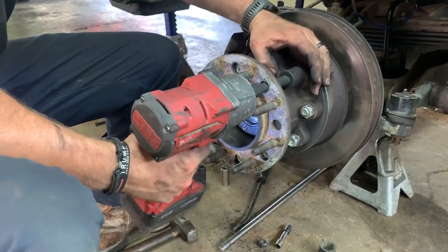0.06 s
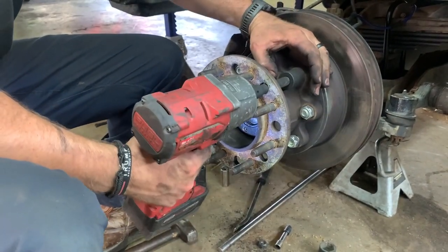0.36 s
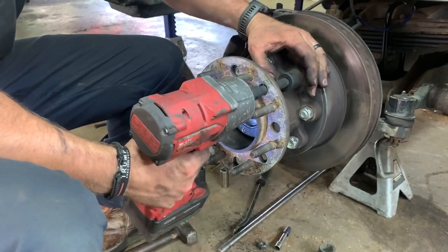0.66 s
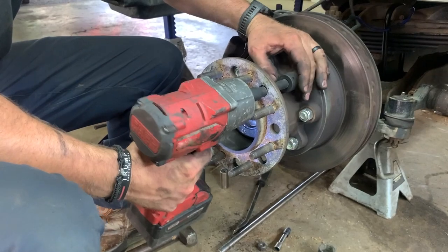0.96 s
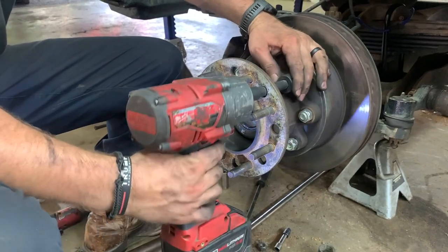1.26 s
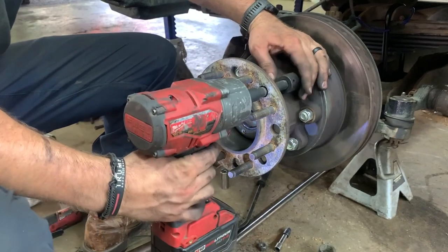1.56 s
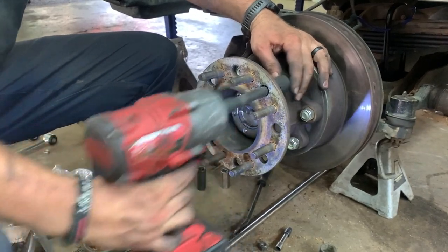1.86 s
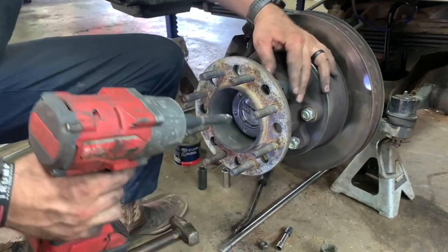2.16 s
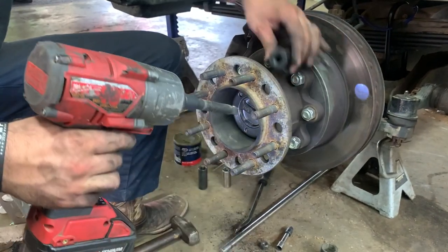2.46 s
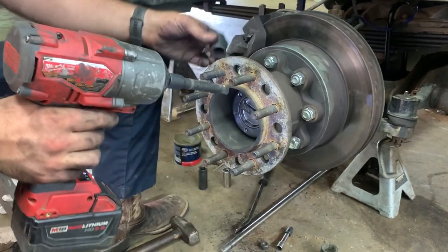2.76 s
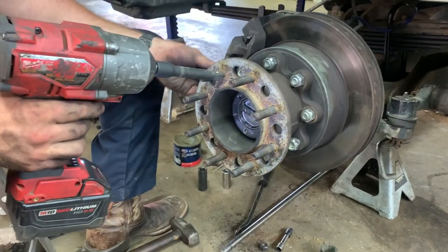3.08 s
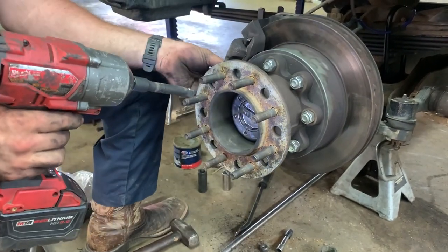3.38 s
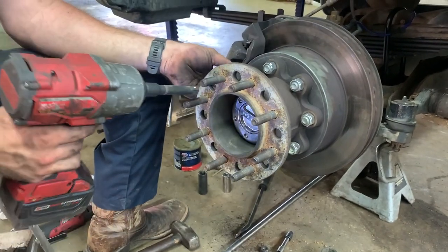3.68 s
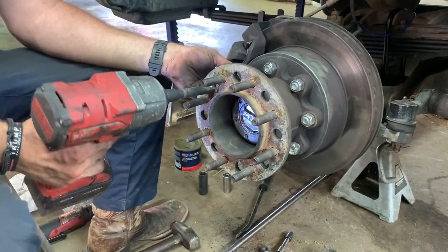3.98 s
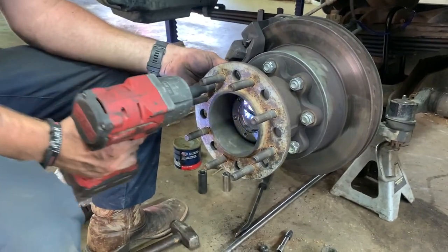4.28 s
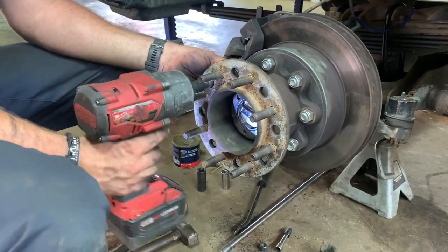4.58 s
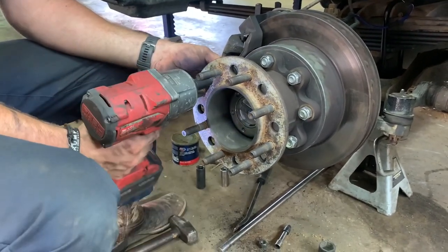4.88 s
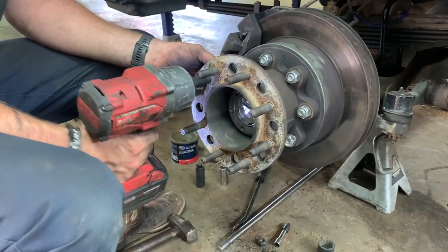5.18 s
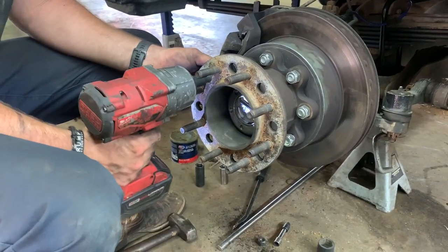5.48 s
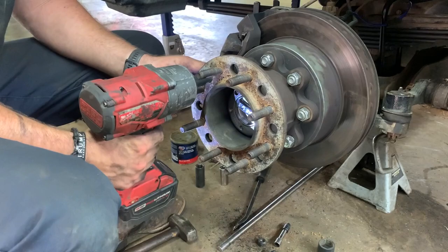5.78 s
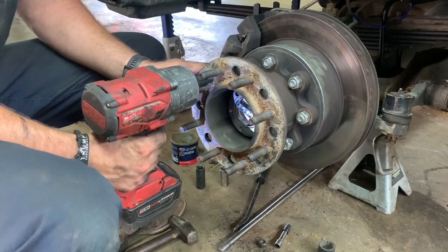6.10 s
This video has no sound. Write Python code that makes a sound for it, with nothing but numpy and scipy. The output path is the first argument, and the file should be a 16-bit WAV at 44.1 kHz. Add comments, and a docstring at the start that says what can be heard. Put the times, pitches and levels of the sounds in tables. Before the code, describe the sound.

A loud, fast metallic rattle opens the scene as a cordless impact wrench drives a nut, making the truck hub and brake disc ring. It stops, and the steel socket comes away with bright clinks and a fading shimmer. Scattered small taps and a few soft low thuds fill the pause, until a brief rasp starts a second hammering burst. The microphone is near, in a garage with a short echo and faint hum.

```python
"""A garage, a closely spaced microphone pair facing a truck hub. A cordless impact wrench hammers a nut
for a second: each blow cracks through the socket and rings hub and brake disc over the motor's whirr.
The socket clinks off the nut and sings freely; soft sliding hisses and more clinks take it to the next
nut. At five seconds it engages with a short loud rasp and the wrench hammers again. Soft low thuds
boom now and then, and the room's tail and a faint hum lie behind it all."""
import sys
import numpy as np
from scipy import signal
from scipy.fft import rfft, irfft
from scipy.io import wavfile
from scipy.ndimage import uniform_filter1d

SR = 44100
rng = np.random.default_rng(int(sys.argv[2]) if len(sys.argv) > 2 else 0)


def unload_wav(signal):
    """Save mono or channel-first audio to the path in sys.argv[1] as 16-bit WAV at rate SR, clipped to [-1, 1]."""
    wavfile.write(
        sys.argv[1],
        SR,
        np.round(np.clip(np.atleast_2d(signal).T, -1, 1) * 32767).astype(np.int16),
    )


N = 270774
TIME = np.arange(N) / SR

# hammer blows, about 27-35 a second; the first burst stumbles to a stop:
# (time [s], force [dB], treble crack trim [dB], low clack trim [dB], t60 of the clang [s])
BLOWS = [(0.013, -18.5, -0.5, -8, 0.061), (0.049, -19.5, 3, -5, 0.044), (0.0856, -19, -2.5, -7, 0.041),
         (0.1216, -21.0, 7, -5, 0.03), (0.1569, -20.5, 0.5, -10, 0.1), (0.1875, -22, 4, -4.5, 0.067),
         (0.2153, -20, 2.5, -5.5, 0.058), (0.2424, -17, 2.5, -6.5, 0.043), (0.2716, -17, 2.5, -9.5, 0.04),
         (0.3002, -20, 3.5, -4.0, 0.054), (0.329, -20.5, 5.5, -8, 0.08), (0.358, -18.5, 3.5, -9.5, 0.045),
         (0.386, -18, 2.5, -8, 0.07), (0.4151, -18.5, 2, -8, 0.056), (0.4436, -18.5, 5.5, -4.5, 0.053),
         (0.472, -17.5, 4, -9, 0.044), (0.5, -20.5, 4.5, -6, 0.058), (0.529, -18.5, 1, -8, 0.055),
         (0.5583, -18.5, 3.5, -12, 0.094), (0.5873, -19.0, 2.5, -6.5, 0.064),
         (0.6157, -17.5, 3.5, -5, 0.058), (0.6463, -17.5, 4.5, -4, 0.031), (0.6742, -19, 6, -8.5, 0.04),
         (0.7043, -20, 10, -8, 0.021), (0.7327, -20.5, 4.5, -9.5, 0.053), (0.7618, -23.5, 2, -6, 0.056),
         (0.7915, -22, 5, -8, 0.049), (0.8205, -22.5, 5.5, -4.5, 0.035), (0.8504, -21, 6.5, -6.5, 0.03),
         (0.879, -22.5, 3, -7, 0.039), (0.9079, -19, 4, -3, 0.036), (0.9382, -23, 4.0, -10.5, 0.062),
         (0.9682, -20, 3.5, -7, 0.063), (0.9911, -24.5, 1.5, -2, 0.048), (1.0001, -22.5, 6, 2, 0.059),
         (1.0258, -23.5, 8.5, -5, 0.044), (1.0447, -26.5, 8, -13, 0.069), (1.061, -27.5, 3.5, -14, 0.055),
         (5.0894, -20.5, 1.5, -5.5, 0.076), (5.129, -20, 4, -7.5, 0.045), (5.167, -21, 4, -8, 0.05),
         (5.205, -22.5, 5, -6, 0.039), (5.2412, -19.5, 0.5, -5.5, 0.049), (5.2778, -20, 4.5, -7, 0.051),
         (5.3141, -23, 5.5, -2.5, 0.041), (5.3515, -20, 5, -7.5, 0.039), (5.387, -20, 4, -10, 0.042),
         (5.425, -19.5, 0.5, -7.5, 0.045), (5.4619, -23, 5, -6.5, 0.069), (5.4996, -18.5, 2.5, -7, 0.05),
         (5.5358, -21.5, 3.0, -4.5, 0.093), (5.564, -19, 4, -6, 0.067), (5.5918, -17.5, 4.5, -3.5, 0.067),
         (5.6208, -17, 2.5, -6, 0.06), (5.6484, -21.0, 6, -4.5, 0.059), (5.678, -16.0, 5.5, -10.5, 0.037),
         (5.7072, -19.0, 3.5, -8, 0.072), (5.735, -22, 1.5, -7.5, 0.045), (5.7648, -19, 4.5, -7.5, 0.038),
         (5.7921, -19.5, 0.5, -9, 0.04), (5.8224, -21.0, 7.5, -7, 0.077), (5.85, -19, 3.0, -11.5, 0.064),
         (5.879, -21.5, 4, -7.5, 0.075), (5.907, -19.5, -2.5, -8.5, 0.061), (5.9371, -19.5, 6.5, -7, 0.056),
         (5.9659, -22.5, 1, -3.5, 0.054), (5.9936, -20.5, 3, -9, 0.052), (6.0231, -20.5, 2.5, -5.5, 0.063),
         (6.0523, -19.0, 2, -9.5, 0.041), (6.0813, -21, 0.5, -10, 0.055), (6.1106, -21, 2.5, -6, 0.058)]
# socket and nuts touching the studs: (time [s], relative click level [dB], tilt [dB/octave],
# click peak [Hz], its lift [dB], ring level [dB], ring centre [Hz], ring spread [octaves])
CLINKS = [(1.29, -69, -1.5, 2270, 4, -80, 2270, 0.33), (1.611, -66.5, -4.5, 2686, 9, -82.5, 2700, .5),
          (1.687, -65, -3.5, 4000, -1, -76, 3510, 0.52), (1.7379, -44.5, 0, 10200, 2, -67, 4500, 1),
          (1.7807, -36, -0.5, 10000, 10.5, -39, 4570, .14), (1.808, -39.5, 3.5, 3570, 11, -41, 3750, 0.44),
          (1.809, -43, 1, 2200, -2, -44, 15100, .06), (1.8509, -33, 5.5, 10400, -1, -44, 6800, 1.06),
          (1.858, -41.5, -4, 2230, 8, -43.5, 2670, 0.29), (1.958, -52, -6, 520, 6, -52, 524, 0.71),
          (2.141, -60.5, -3.5, 3600, 16, -62, 3620, 0.091), (3.062, -48, 5.5, 3030, 11, -63, 4060, 0.78),
          (3.17, -54, 4.5, 6600, 10.5, -58, 15050, .22), (3.174, -59, 4, 3000, 18, -63, 3250, 0.22),
          (3.234, -70, -2, 6500, 4.5, -77, 4500, 1), (3.487, -58, 6, 6700, 15, -66, 2920, 0.38),
          (3.6, -63, 1, 2200, 8.5, -64.5, 2230, 0.53), (3.784, -48, -3, 1680, 11, -54, 1785, 0.13),
          (3.7944, -49.5, -4.5, 1150, 9, -51, 2730, 0.41), (3.796, -52.5, -3, 3500, 18, -64, 5970, 0.52),
          (3.932, -66.5, -3, 5500, 8, -76, 4500, 1), (4.2412, -45.5, -2, 6400, 10, -66, 3570, 0.85),
          (4.2467, -44, -3, 1200, 5, -60, 4570, .1), (4.3862, -62, -1.5, 4500, 3, -72, 4580, 1.22),
          (4.43, -53, -4, 6500, 6, -80, 4500, 1), (4.463, -58, -7, 1000, 3, -80, 1500, 1.1),
          (4.534, -69.5, -3, 10000, 5, -77, 4500, 1), (4.602, -41.5, -2.5, 10600, 13.5, -57, 3270, 0.45),
          (4.612, -49.5, -4, 2700, 16, -53, 3300, 0.38), (4.644, -58, -7.5, 1300, 1, -65, 5440, 0.28),
          (4.72, -60, -7.5, 2200, 1, -71, 2700, .6), (5.001, -36.5, 8, 15000, -2, -61.5, 10000, 1.1)]


def hammer(crack_s=.00063, scrape_s=.00097, rebound=.45, rebound_s=.0022, echo=.2, echo_s=.012):
    """The hammer scrapes up its cam and strikes the anvil: crack, clang, socket rebound, floor echo."""
    # spectrum of a blow: (frequency [Hz], density [dB])
    colour = [(20, -50), (45, -30.5), (110, -17.5), (210, -13), (350, -18), (560, -5.5), (720, -11.5),
              (1100, -3), (3000, -5), (4100, -3.5), (5900, -3.5), (7000, -1), (10500, 6.5), (12900, 3),
              (15300, 4)]
    # the socket sits on the first nut, on the second running down, on the second once tight: (start [s])
    seatings = [0, 5.0, 5.55]
    # broad socket resonances: (frequency [Hz], width [Hz], lift in each of the three seatings [dB])
    resonances = [(580, 90, -1.5, 6.3, 3.5), (1300, 210, -2, 0.66, 1.7), (1837, 960, 3.5, 1.3, 4.2),
                  (2740, 300, 5, 3.5, 1.7), (3350, 120, 5, 7.2, 3.6), (3700, 230, 3.5, 3.1, 4.2),
                  (6980, 240, 2.5, 9.1, 8.3), (8150, 230, 1, 2, 4.4), (9050, 260, 1.5, 7.5, 5.5),
                  (9660, 240, 4, 1.5, 4.2), (10450, 220, 3.5, 1.2, 1.9), (11800, 500, 2.5, 2.5, 2.8),
                  (14700, 280, 2.5, 4.5, 7)]
    lead, out = 256, np.zeros((2, N))
    t = (np.arange(4096) - lead) / SR

    def clang(t60, rise_s, sharp, scrape):
        """Envelope of one band; a shorter clang packs the same energy into a higher peak."""
        age = np.maximum(t - np.array([[0], [rebound_s], [echo_s]]), 0)
        arrivals = np.array([[1], [rebound], [echo]]) * (1 - np.exp(-age / rise_s))
        arrivals *= gain_of(-60 * age / t60)
        arrivals[0] *= 1 + sharp * np.exp(-age[0] / crack_s)
        cam = scrape * np.exp(-abs(t) / scrape_s)
        return evened(np.sqrt((arrivals ** 2).sum(0) + cam ** 2))

    bands_hz = [(0, 2500), (2500, 8500), (8500, SR)]
    alike = [.55, .2, .25]  # share of each band that repeats from blow to blow
    steel = [noise(colour, len(t), *band) for band in bands_hz]
    for s, db, treble_db, clack_db, t60 in BLOWS:
        peaks = np.array(resonances)[:, [0, 1, 1 + np.searchsorted(seatings, s)]]
        clack = gain_of(clack_db - 11.2) * clang(t60, rise_s=.0003, sharp=.8, scrape=.25)
        body = gain_of(-11) * clang(t60, rise_s=.00035, sharp=.31, scrape=.4)
        crack = gain_of(treble_db - 9.5) * clang(t60, rise_s=.0002, sharp=.62, scrape=.17)
        for band, envelope, same, share in zip(bands_hz, [clack, body, crack], steel, alike):
            grain = np.sqrt(share) * same + np.sqrt(1 - share) * noise(colour, len(t), *band)
            grain = lifted(patchy(grain, depth_db=3.5, width_hz=260), peaks)
            add(out, s - lead / SR, gain_of(db) * envelope * grain)
    return out


def motor(spin_up_s=.22, brake_s=.0083, flutter=.2):
    """Gear whirr: rises with the trigger, follows the load and pulses with the hammer's spring."""
    # spectrum of the gears: (frequency [Hz], density [dB])
    colour = [(20, -40.5), (50, -19), (200, -6), (380, -2), (600, 2), (2500, 6.5), (5000, -2.5),
              (7200, -2.5), (11000, -7.5), (15500, -10.5)]
    # trigger pulls: (pressed [s], let go [s], whirr re blow force [dB])
    pulls = [(-.15, 1.023, -17), (4.966, 6.2, -18.6)]
    blow_s, force_db, *_ = np.transpose(BLOWS)
    blow_phase = np.interp(TIME, blow_s, np.arange(len(BLOWS)))
    running = sum(gain_of(db) * np.clip((TIME - on) / spin_up_s, 0, 1)
                  * np.exp(-np.maximum(TIME - off, 0) / brake_s) for on, off, db in pulls)
    load = gain_of(np.interp(TIME, blow_s, uniform_filter1d(force_db, size=5)))
    return noise(colour, N) * running * load * (1 + flutter * np.cos(2 * np.pi * blow_phase))


def hub_ring(hammered_db=-10.5, rise_s=.00066):
    """Hub and brake disc ring after each blow, damped by the pressed tool, and freely after a touch."""
    # their modes: (frequency [Hz], weight when hammered [dB], weight when touched [dB], t60 [s])
    modes = [(533, -13, -18, .28), (964, -8, -13, .15), (1190, -2, -11, .2), (1281, -10, -9, .2),
             (1335, -4, -12, .15), (1809, -8, -5, .25), (1884, -2, -9, .1), (2162, 1.5, -7, .23),
             (2353, -4, -12, .2), (2731, -1, 1, .27), (3169, -5, -10, .15), (3310, -6, -6, .17),
             (3499, -8, -8, .15), (3618, -6, -9, .25), (3838, -12, -11, .15), (4570, .5, -3, .26),
             (4603, -11, -7, .26), (5588, -13.5, -12, .4), (6880, -3, -12, .1), (7031, -9, -9, .3),
             (7741, -10, -12, .1), (9636, 5, -7, .28), (10282, 0, -2, .07), (10837, 2, -2, .09),
             (11254, -3, -5, .09), (11910, -7, -9, .15), (14350, -3, -5, .05), (15128, -2, -2, .2)]
    hammered, touched = np.array(modes)[:, [0, 1, 3]], np.array(modes)[:, [0, 2, 3]]
    out, t = np.zeros((2, N)), TIME[:SR]
    for s, db, *_ in BLOWS:
        tone = ring(hammered, t[:SR // 2], spread_db=2, centre_hz=4200, octaves=2.4, longest_s=.45)
        add(out, s, gain_of(db + hammered_db) * tone)
    for s, *_, ring_db, centre_hz, octaves in CLINKS:
        tone = ring(touched, t, spread_db=1, centre_hz=centre_hz, octaves=octaves)
        add(out, s, gain_of(ring_db) * tone * (1 - np.exp(-t / rise_s)))
    return out


def axle():
    """Every blow nudges the axle; nudges that fall in step with a mode build up to a drone."""
    # low axle modes: (frequency [Hz], level re blow force [dB], t60 [s])
    modes = [(105, -52, .12), (174.7, -44.5, 0.68), (209.4, -40.5, 0.61), (238.5, -40, 0.69)]
    out, nudge = np.zeros((2, N)), dying_sines(modes, TIME[:SR])
    for s, db, *_ in BLOWS:
        add(out, s, gain_of(db) * nudge[None])
    return out


def clinks(t60=.087, rise_s=.00036, crack=.48, crack_s=.001, slide=.68, slide_s=.0038, peak_width=.18):
    """Light steel contacts: a gritty slide into a short click with one broad peak of its own."""
    # spectrum of a click: (frequency [Hz], density [dB])
    colour = [(40, -24), (180, -9.5), (450, -4.5), (1300, 3), (2800, -0.5), (6000, -3.5), (11000, -6),
              (15500, -8)]
    lead, out = 2048, np.zeros((2, N))
    t = (np.arange(8192) - lead) / SR
    age = np.maximum(t, 0)
    click = (1 - np.exp(-age / rise_s)) * gain_of(-60 * age / t60) * (1 + crack * np.exp(-age / crack_s))
    for s, db, tilt_db, peak_hz, lift_db, *_ in CLINKS:
        grit = abs(evened(uniform_filter1d(rng.standard_normal(len(t)), 100)))
        envelope = click + slide * grit * np.exp(-abs(t) / slide_s)
        grain = patchy(noise(colour, len(t), tilt_db=tilt_db), depth_db=2.5, width_hz=264)
        grain = lifted(grain, [(peak_hz, peak_width * peak_hz, lift_db)])
        add(out, s - lead / SR, gain_of(db - 1.5) * envelope * grain)
    return out


def socket_ring(rise_s=.0023):
    """Knocked while free of the nut, the socket sings: a short bright note, then a beating shimmer."""
    # close modes of the long socket: (frequency [Hz], weight [dB], t60 [s])
    modes = [(1760, -27, .3), (1949, -21, .3), (1992, -28.5, 2.0), (2137, -19, .9), (2163, 0, .21),
             (2243, -21.5, 1.5), (2259, -27, 1.2), (2268, -26, 1.6), (2279, -9, .24), (2288, -15, .8),
             (2353, -10, .26)]
    # knocks on it: (time [s], level [dB], ring centre [Hz], ring spread [octaves])
    knocks = [(1.29, -70, 2270, .016), (1.859, -34, 2200, 0.5), (3.7944, -61, 2252, 0.013)]
    out, t = np.zeros((2, N)), TIME[:2 * SR]
    for s, db, centre_hz, octaves in knocks:
        tone = ring(modes, t, spread_db=.5, centre_hz=centre_hz, octaves=octaves)
        add(out, s, gain_of(db) * tone * (1 - np.exp(-t / rise_s)))
    return out


def slides_and_rasp():
    """Soft sliding hisses, and a short loud rasp as the socket engages just before the hammering."""
    # the hisses and, last, the rasp: (middle [s], half length [s], level [dB])
    events = [(2.15, .31, -80), (2.598, 0.15, -79), (3.483, 0.014, -62), (3.594, 0.015, -57),
              (4.183, 0.059, -76.5), (4.977, 0.0091, -67.5), (5.084, 0.01, -30)]
    # their spectrum: (frequency [Hz], density [dB])
    colour = [(500, -10), (3000, 2.5), (6500, -5.5), (11000, 1), (15500, -12)]
    swells = sum(gain_of(db) * np.exp(-((TIME - s) / half_s) ** 2) for s, half_s, db in events)
    return noise(colour, N) * swells


def thuds(swell_s=.046):
    """A dull push sets a few low modes booming."""
    # soft thuds: (time [s], relative boom level [dB], relative push level [dB], push rise time [s])
    events = [(.415, -21, -36, 0.022), (3.991, -74.5, -37.5, 0.03), (4.005, -26, -32.5, 0.015),
              (4.486, -48.5, -57, 0.018), (5.314, -45.5, -72, .03), (5.561, -44, -48.5, 0.022)]
    # modes of the boom: (frequency [Hz], weight [dB], t60 [s])
    modes = [(57.27, -2.5, 0.66), (85.75, 5.5, .26), (104.65, 2, 0.16), (150, -20, 0.24)]
    # spectrum of the push: (frequency [Hz], density [dB])
    colour = [(25, -33), (70, 7.5), (115, 1.5), (155, 1), (270, -11), (400, -30.5), (900, -65)]
    out, t = np.zeros((2, N)), TIME[:SR]
    boom = dying_sines(modes, t) * (1 - np.exp(-(t / swell_s) ** 2))
    for s, boom_db, push_db, rise_s in events:
        push = noise(colour, len(t))[:1] * t / rise_s * np.exp(1 - t / rise_s)
        add(out, s, gain_of(boom_db) * boom + gain_of(push_db) * push)
    return out


def garage(x, delay_s=.012):
    """The room's diffuse tail at each microphone, every band dying at its own speed."""
    # reverberation time: (frequency [Hz], t60 [s])
    decay = [(100, 0.76), (240, 0.7), (420, 0.3), (800, 0.41), (1800, 0.32), (4800, 0.37), (11000, 0.37),
             (15000, .22)]
    # tone of the tail, with two narrow hollows in the treble that are not the room's:
    # (frequency [Hz], gain [dB])
    tone = [(100, 4), (500, -5), (1000, -6), (1800, -8.5), (2900, -5), (4400, -4), (7000, -13),
            (8600, -18.5), (11000, -11.5), (13400, -17.5), (15000, -13)]
    hz, t, spectra = signal.stft(rng.standard_normal((2, SR)), SR, nperseg=256)
    t60 = read(decay, hz)[:, None]
    spectra *= gain_of(read(tone, hz)[:, None] - 60 * t / t60)
    spectra *= np.sqrt(2 * np.log(1000) / (t60 * SR))  # a longer decay adds no energy
    tail = signal.istft(spectra, SR, nperseg=256)[1]
    out = np.zeros((2, N))
    add(out, delay_s, signal.fftconvolve(x, tail, axes=1))
    return out


def background(floor_db=-68, hum_hz=147, hum_db=-78):
    """Quiet room tone and a faint steady hum."""
    # spectrum of the room tone: (frequency [Hz], density [dB])
    colour = [(20, -41), (35, -18.5), (55, -2), (80, -.5), (115, -11.5), (152, -1.5), (200, -13), (280, -5),
              (450, -15), (1000, -13.5), (2500, -24), (5000, -33), (10000, -46), (15500, -58.5)]
    return gain_of(floor_db) * noise(colour, N) + gain_of(hum_db) * np.sin(2 * np.pi * hum_hz * TIME)


def microphones(x, likeness, hz, radians=0, balance_db=0):
    """The close pair hears a partly shared sound, shifted in phase and level between left and right."""
    left, right = rfft(x)
    same = np.clip(read(likeness, hz), -.99, .99)
    mid, side = (left + right) * np.sqrt(1 + same) / 2, (left - right) * np.sqrt(1 - same) / 2
    turn = np.exp(.5j * radians) * gain_of(balance_db / 2)
    return irfft(np.array([(mid + side) * turn, (mid - side) / turn]), N)


def ring(modes, t, spread_db, centre_hz, octaves, longest_s=2):
    """Dying modes, struck a little differently each time; the contact favours those near a centre."""
    hz, db, free_t60 = np.transpose(modes)
    t60 = np.minimum(free_t60, longest_s)  # pressing on the steel chokes its longest modes
    size = gain_of(db + spread_db * rng.standard_normal(len(hz))) * t60 / free_t60
    size /= 1 + (np.log2(hz / centre_hz) / octaves) ** 4
    left = np.exp(2j * np.pi * rng.random(len(hz)))
    right = left * np.exp(.5j * np.pi * rng.uniform(-1, 1, len(hz)))
    waves = np.exp(np.outer(2j * np.pi * hz - np.log(1000) / t60, t))
    return ((np.array([left, right]) * size / np.linalg.norm(size)) @ waves).real


def dying_sines(modes, t):
    """Modes that start together from rest and die away."""
    return sum(gain_of(db - 60 * t / t60) * np.sin(2 * np.pi * hz * t) for hz, db, t60 in modes)


def noise(colour, size, low_hz=0, high_hz=SR, tilt_db=0):
    """Two unrelated noises of unit rms with a spectrum, band edges and a tilt per octave above 400 Hz."""
    hz = np.fft.rfftfreq(size, 1 / SR)
    gain = gain_of(read(colour, hz) + tilt_db * np.log2(np.maximum(hz, 400)))
    gain *= (hz >= low_hz) & (hz < high_hz)
    return evened(irfft(rfft(rng.standard_normal((2, size))) * gain, size))


def patchy(x, depth_db, width_hz):
    """Random peaks and dips in the spectrum: no two strikes land alike."""
    hz = np.fft.rfftfreq(x.shape[1], 1 / SR)
    ripple = np.interp(hz / width_hz, np.arange(256), rng.standard_normal(256))
    return evened(irfft(rfft(x) * gain_of(depth_db * ripple), x.shape[1]))


def lifted(x, peaks):
    """Raises broad resonances (frequency [Hz], width [Hz], lift [dB]) out of a noise."""
    hz = np.fft.rfftfreq(x.shape[1], 1 / SR)
    db = sum(lift_db / (1 + (2 * (hz - centre) / width) ** 2) for centre, width, lift_db in peaks)
    return evened(irfft(rfft(x) * gain_of(db), x.shape[1]))


def gain_of(db):
    """Decibels to amplitude."""
    return 10 ** (np.asarray(db) / 20)


def evened(x):
    """Scales to unit rms."""
    return x / np.sqrt(np.mean(x ** 2) + 1e-20)


def read(points, hz):
    """Reads a table on a log-frequency axis."""
    f, value = np.transpose(points)
    return np.interp(np.log(hz + 1), np.log(f + 1), value)


def add(mix, s, sound):
    """Mixes a sound in at time s."""
    part = mix[:, max(round(s * SR), 0):][:, :sound.shape[1]]
    part += sound[:, :part.shape[1]]


def scene():
    """The work and the thuds reach the microphones from in front, tail and room tone from all around."""
    # likeness of left and right for sound from in front: (frequency [Hz], correlation [0 to 1])
    front_likeness = [(60, 0.94), (300, .8), (1350, 0.74), (2200, 0.64), (3200, 0.26), (3750, 0.11),
                      (4400, 0.3), (5900, 0.053), (7000, 0.94), (8550, 1), (9300, 0.85), (10200, .78),
                      (10950, 0.69), (12400, .68), (13450, 1), (14600, .77), (15700, 1)]
    # phase between the microphones for that sound: (frequency [Hz], left leads by [rad])
    front_phase = [(50, 0.5), (450, 0.14), (1100, 0.57), (1900, 1), (2250, 1.23), (2700, 2), (3400, 2.5),
                   (4000, 0.7), (6300, -0.4), (8550, -3), (10500, -6), (11200, -6), (13400, -9.5),
                   (15700, -11.5)]
    # its balance: (frequency [Hz], left minus right [dB])
    front_balance = [(40, -1), (75, -3.5), (140, -2.1), (500, 1.8), (4000, -1.74), (8000, -0.2)]
    # likeness for sound from all around: (frequency [Hz], correlation [-1 to 1])
    diffuse_likeness = [(60, 0.97), (130, .88), (300, .68), (450, 0.78), (680, -0.083), (1400, -0.41),
                        (2500, 0.18), (8000, -0.33), (15000, 0.19)]
    hz = np.fft.rfftfreq(N, 1 / SR)
    wrench = hammer() + motor()
    contacts = clinks() + slides_and_rasp()
    steel = hub_ring() + socket_ring()
    tail = garage(gain_of(-1) * wrench + contacts + steel / 2)
    direct = wrench + contacts + steel + axle() + gain_of(-3.5) * thuds()
    front = microphones(direct, front_likeness, hz, read(front_phase, hz), read(front_balance, hz))
    return front + microphones(tail + background(), diffuse_likeness, hz)


def record(dry):
    """The hardest cracks overload softly; a steep low-pass limits the band."""
    low_pass = signal.firwin(301, cutoff=15800, window=("kaiser", 8), fs=SR)
    return signal.oaconvolve(np.tanh(dry), low_pass[None], "same", axes=1)


dry = scene()
out = record(dry)
unload_wav(out)
```